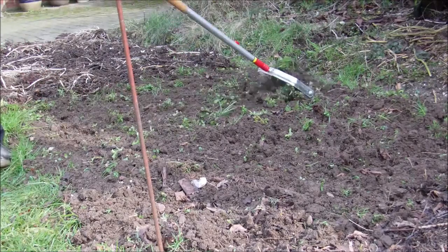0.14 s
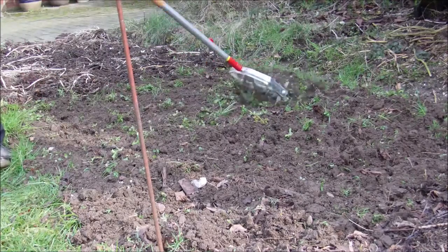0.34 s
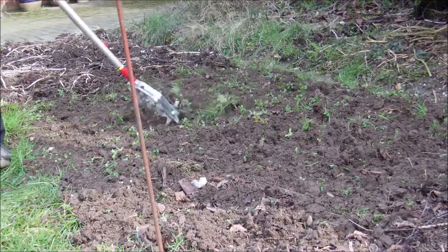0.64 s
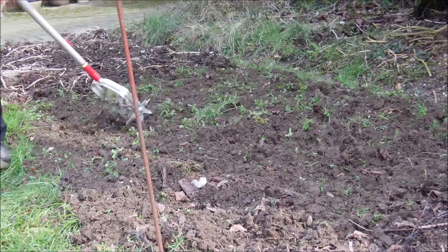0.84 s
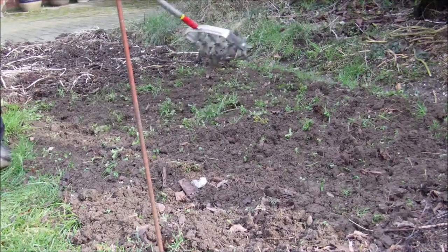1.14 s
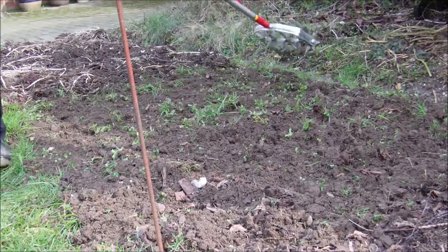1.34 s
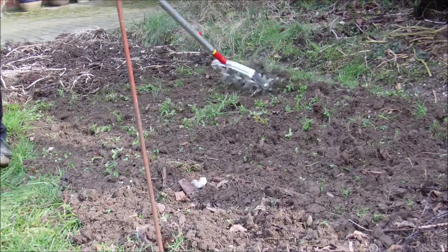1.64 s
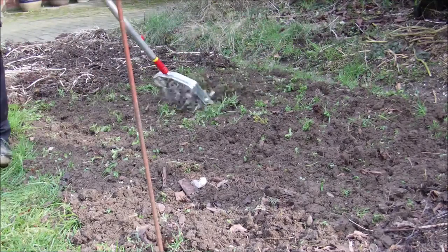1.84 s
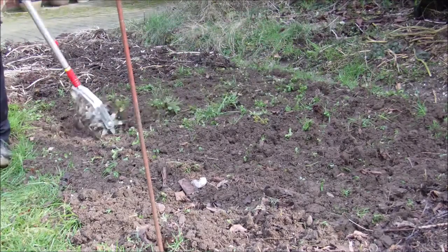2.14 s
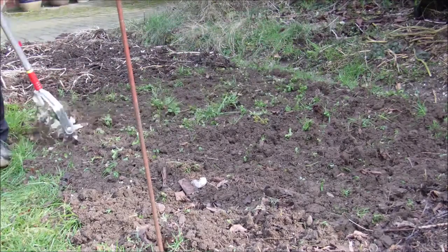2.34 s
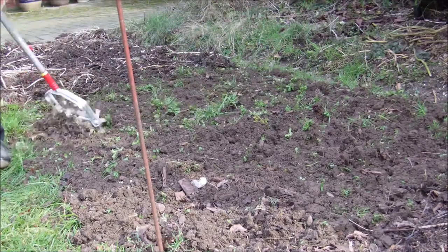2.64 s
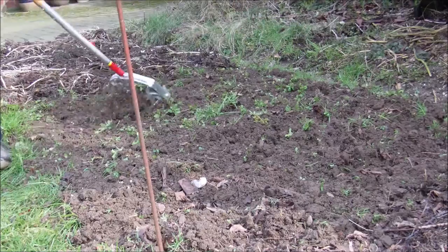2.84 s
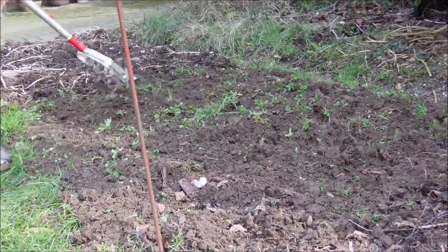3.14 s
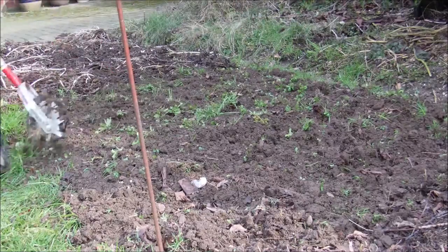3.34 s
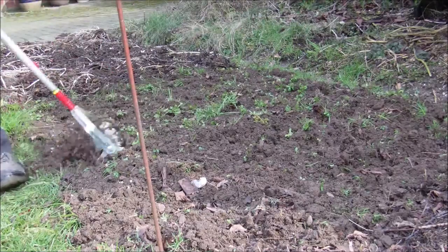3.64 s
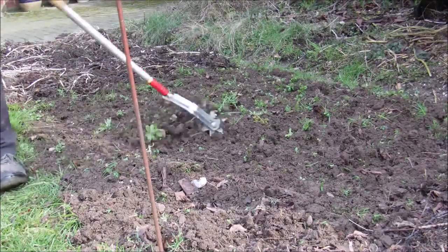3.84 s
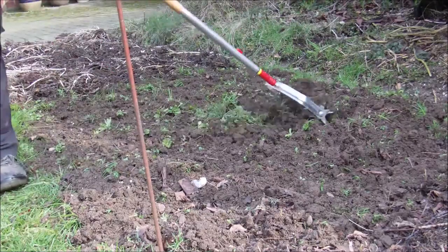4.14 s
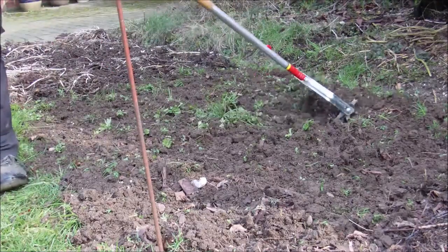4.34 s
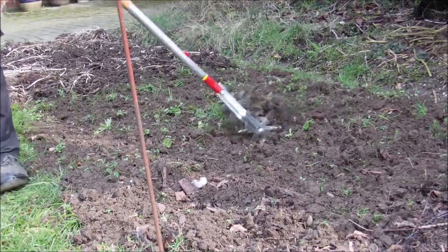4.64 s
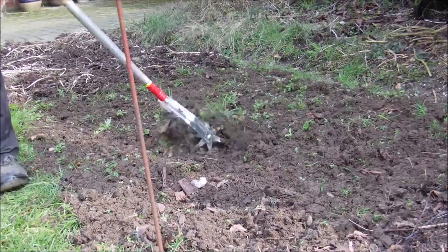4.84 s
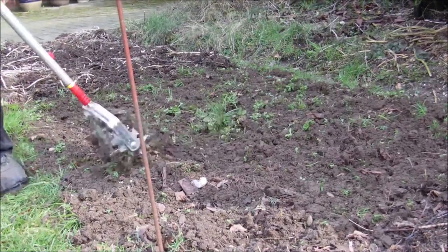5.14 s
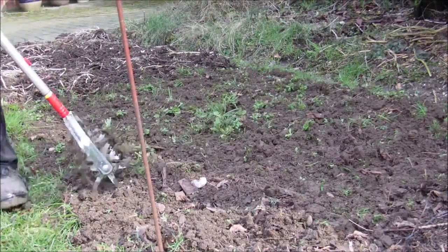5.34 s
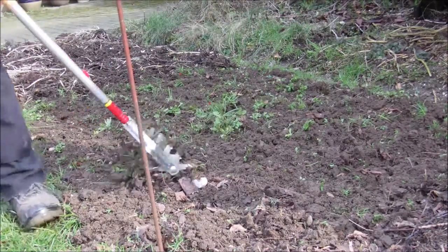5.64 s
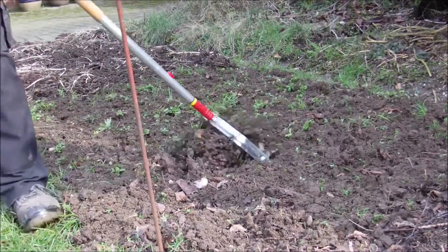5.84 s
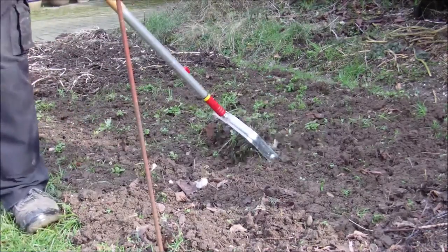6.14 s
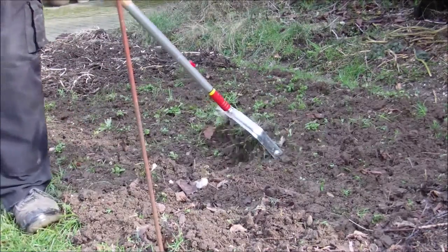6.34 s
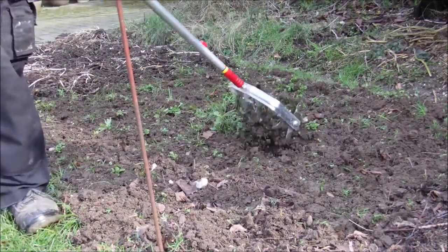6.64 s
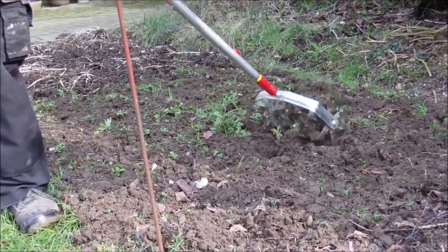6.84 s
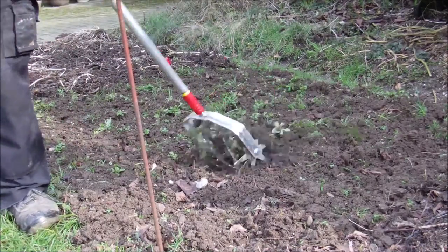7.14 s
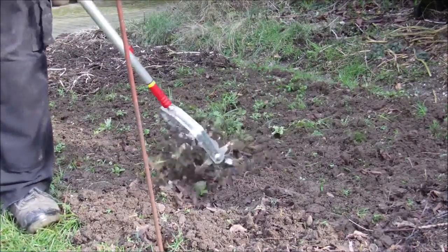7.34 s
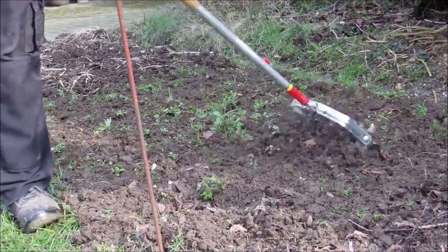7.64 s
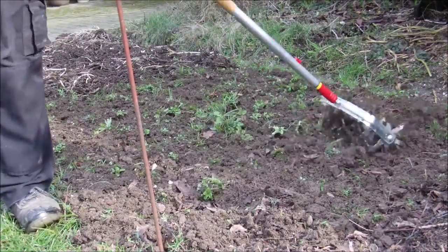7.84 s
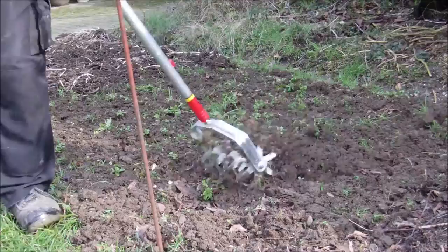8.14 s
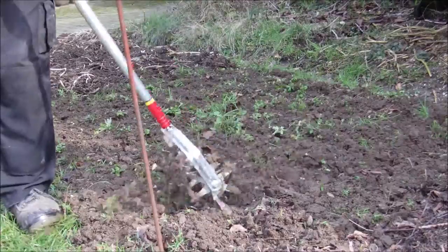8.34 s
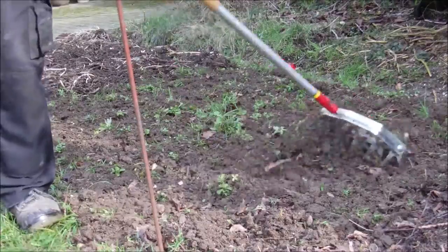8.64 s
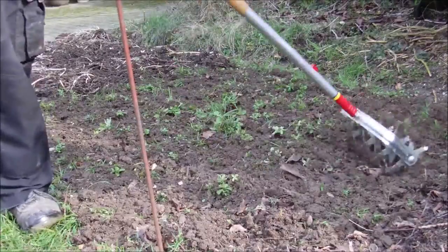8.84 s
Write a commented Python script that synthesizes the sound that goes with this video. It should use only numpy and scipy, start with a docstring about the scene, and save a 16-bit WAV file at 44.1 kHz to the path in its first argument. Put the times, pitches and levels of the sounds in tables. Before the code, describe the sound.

Close, dry outdoor sound of metal tines working earth: crunchy crumbs and hissing sand rise and fall with every stroke, steel ticks against grit, clods thud softly. A tiny squeal opens, then a piercing metallic squeal with raspy squeaks bursts out partway through. Faint whirring accompanies some movements. Later strokes come faster, with sharper clinks at the end. Soft garden air and occasional bird chirps lie behind.

```python
"""A long-handled cultivator with steel star wheels is pushed and pulled through a garden bed.
Shaped noise and tiny damped rings make the crumbling soil and sliding grit, swelling with each stroke.
Damped modes make grit clink on steel and dull knocks; a narrow noise band whirrs faintly, gliding.
The dry axle squeals in one wheel mode and squeaks in others, as tones of unsteady pitch.
A small bird calls in arched, gliding notes over faint garden air."""
import sys
import numpy as np
from scipy import signal
from scipy.fft import rfft, irfft, next_fast_len
from scipy.io import wavfile
from scipy.ndimage import uniform_filter1d, map_coordinates

SR = 44100
rng = np.random.default_rng(int(sys.argv[2]) if len(sys.argv) > 2 else 0)


def master(y):
    """Save y as 16-bit WAV."""
    cut = np.clip(np.atleast_2d(y).T, -1, 1)
    pcm = np.round(cut * 32767)  # scale
    wavfile.write(sys.argv[1], SR, pcm.astype(np.int16))


N = 396900
TOP_HZ = 16050  # band limit of the whole scene
TIME = np.arange(N) / SR


def amp(db):
    """Decibels to gain."""
    return 10 ** (np.asarray(db) / 20)


def unit(x):
    """Scale to rms 1."""
    return x / np.sqrt(np.mean(x ** 2) + 1e-20)


def add(track, s, sound):
    """Mix a sound into a track at s seconds."""
    part = track[max(round(s * SR), 0):][:len(sound)]
    part += sound[:len(part)]


def wobble(rate_hz, size=N):
    """Smooth random curve through rate_hz knots a second."""
    knots = rng.standard_normal(int(size * rate_hz / SR) + 4)
    return map_coordinates(knots, [np.arange(size) * rate_hz / SR])


def coloured(x, spectrum):
    """Shape x by (freq_hz, density_db_per_hz) points, at rms 1."""
    m = next_fast_len(len(x) + 8192)
    hz, db = np.transpose(spectrum)
    log_hz = np.log(np.fft.rfftfreq(m, 1 / SR) + 1)
    gain = amp(np.interp(log_hz, np.log(hz), db))
    return unit(irfft(rfft(x, m) * gain, m)[:len(x)])


def patchy(x, depth_db):
    """Let narrow, short-lived resonances come and go in x."""
    z = signal.stft(x, nperseg=2048)[2]
    field = uniform_filter1d(rng.standard_normal(z.shape), size=4, axis=0)  # across frequency
    field = uniform_filter1d(field, size=5, axis=1)  # across time
    gain = amp(depth_db * np.clip(unit(field), -2, 2))
    return signal.istft(z * gain, nperseg=2048)[1][:N]


def grains(count, centre_hz, spread, cycles, scatter_db, size):
    """Many tiny damped rings of random time, pitch and strength, at rms 1."""
    start, pick, strength = rng.random((count, 3)).T
    hz = np.minimum(centre_hz * np.exp(spread * (2 * pick - 1)), TOP_HZ)[:, None]
    turns = hz * np.arange(size) / SR
    heavy = np.minimum(-np.log(1 - strength), 5)
    rings = np.sin(2 * np.pi * turns) * np.exp(-turns / cycles)
    rings *= amp(scatter_db * heavy)[:, None]
    where = (start * N).astype(int)[:, None] + np.arange(size)
    return unit(np.bincount(where.ravel(), rings.ravel(), N)[:N])


def ringing(modes, t, detune, vary_db):
    """Damped modes, excited differently by every blow."""
    hz, db, t60_s = np.transpose(modes)[:, :, None]
    level, shift, phase = rng.uniform(-np.sqrt(3), np.sqrt(3), (3, len(modes), 1))
    envelope = amp(db + vary_db * level - 60 * t / t60_s)
    turns = hz * (1 + detune * shift) * t + phase
    return np.sum(envelope * np.sin(2 * np.pi * turns), axis=0)


def outdoors(x, wet_db, t60_s):
    """Ground and shrubs scatter back a faint short tail."""
    t = np.arange(SR // 3) / SR
    tail = rng.standard_normal(len(t)) * amp(-60 * t / t60_s) * (1 - np.exp(-t / 0.0093))
    return x + amp(wet_db) * signal.fftconvolve(x, tail / np.linalg.norm(tail))[:N]


# pushes and pulls, levels before trim: fastest_s, speed_up_s, slow_down_s, crumble_db, grit_db
STROKES = [(0.36, .22, 0.27, -66, -64), (0.761, 0.23, 0.18, -65, -86), (1.7, 0.38, 0.29, -74, -65.5),
           (2.08, 0.22, 0.32, -67.5, -74), (2.64, 0.16, 0.27, -74.5, -64), (3.601, 0.2, .3, -68.5, -62.5),
           (4.7, 0.34, 0.5, -72.5, -64.5), (5.719, 0.44, 0.22, -71, -62.5), (6.28, 0.25, 0.24, -72, -80.5),
           (6.8, .15, 0.17, -67, -69.5), (7.03, 0.147, 0.28, -71.5, -65.5), (7.5, 0.15, 0.21, -67.5, -60.5),
           (8.0, 0.26, 0.18, -72.5, -63.5), (8.48, 0.37, 0.27, -64, -62.5), (8.95, 0.23, .2, -68, -63.5)]
SETTLE_CRUMBLE_DB, SETTLE_GRIT_DB = -73, -79  # loose earth trickling between strokes
STROKE_SHAPE = 3.5  # 2 is a bell, more is flatter on top


def effort(column):
    """Level in dB of crumbs (0) or grit (1): each stroke swells to its fastest moment and dies away."""
    rows = np.array(STROKES)
    fastest_s, rise_s, fall_s = rows.T[:3, :, None]
    peak_db = rows.T[3:][column][:, None]
    coarse_s = TIME[::100]
    lag_s = coarse_s - fastest_s
    width_s = np.where(lag_s < 0, rise_s, fall_s)
    swells = amp(peak_db) * np.exp(-np.abs(lag_s / width_s) ** STROKE_SHAPE)
    settle = amp((SETTLE_CRUMBLE_DB, SETTLE_GRIT_DB)[column])
    level_db = 10 * np.log10(np.sum(swells ** 2, axis=0) + settle ** 2)
    return np.interp(TIME, coarse_s, level_db)


# spectrum of crumbling soil: freq_hz, density_db_per_hz
CRUMBLE = [(18, -54.5), (30, -24), (106, -12.5), (261, -15), (383, -1.5), (551, -8.5), (683, -10.5),
           (922, -5), (1270, -6), (1410, -3), (2360, -0.5), (2580, -0.5), (5000, -3.5), (6500, -29.5),
           (11000, -120)]
# spectrum of grit sliding on steel: freq_hz, density_db_per_hz
GRIT = [(1180, -29.5), (2000, -3), (2180, -10), (2910, -5), (3490, -10), (4010, -10), (4900, -5.5),
        (6200, -1.5), (7840, -5), (8630, -1.5), (10200, -1), (13900, -9), (16000, -16.5)]
# steel wheel modes, also rung by the clinks: freq_hz, level_db, t60_s
WHEEL = [(2252, -17, .05), (2940, -7, .08), (4380, -10, .11), (6320, -3.5, 0.15), (8600, 0.5, 0.097),
         (9200, -0.5, .1), (10340, 2, 0.066), (11300, -9.5, 0.076)]
CRUMBLE_TRIM_DB, GRIT_TRIM_DB, SINGING_DB = -1.8, 3.0, -15  # singing relative to grit


def soil():
    """Crumbs break and fall while sand slides over the tines; both follow strokes and surge unevenly."""
    crumble_db, grit_db = effort(0), effort(1)
    digging_db = 1.3 * wobble(24) + 0.81 * wobble(9) + 0.7 * wobble(70)
    crumbs = grains(count=9000, centre_hz=1540, spread=1.1, cycles=1.9, scatter_db=3.5, size=400)
    sand = grains(count=24000, centre_hz=7050, spread=0.75, cycles=1.5, scatter_db=4.0, size=80)
    crumble = coloured(patchy(0.5 * crumbs + rng.standard_normal(N), depth_db=6.5), CRUMBLE)
    grit = coloured(patchy(0.96 * sand + rng.standard_normal(N), depth_db=3.0), GRIT)
    # sliding sand keeps the steel faintly singing
    wheel = ringing(WHEEL, np.arange(SR // 8) / SR, detune=0.002, vary_db=1)
    singing = unit(signal.fftconvolve(sand, wheel)[:N])
    crumbling = crumble * amp(crumble_db + digging_db + CRUMBLE_TRIM_DB)
    sliding = (grit + amp(SINGING_DB) * singing) * amp(grit_db + digging_db + GRIT_TRIM_DB)
    return crumbling + sliding


# spectrum of still air: freq_hz, density_db_per_hz
GARDEN = [(15, -37.5), (25, -9), (180, -11), (373, -3.5), (1020, 0.5), (2610, -6.5), (5280, -2),
          (7710, -4.5), (9070, -2.5), (14800, -5.5), (16000, -15)]


def garden_air():
    """Steady shaped noise of the quiet garden."""
    return amp(-71) * coloured(rng.standard_normal(N), GARDEN)


# swells of the squeal, levels before the soft ceiling: peak_s, half_length_s, level_db
SQUEALS = [(0.022, .038, -13), (0.115, .02, -43.5), (3.822, .015, -33), (3.84, .009, -8), (3.883, .018, -1),
           (3.978, .018, -14), (4.008, .017, -12), (4.05, .025, -19.5), (4.08, .022, -12.5),
           (4.116, .015, -20.5), (4.18, .048, -45), (5.692, .026, -44), (7.6, .045, -54),
           (8.635, .033, -40)]
# spectrum of the hiss heard with the tone: freq_hz, density_db_per_hz
HISS = [(20, -3), (55, 4), (100, -1), (1000, 0.5), (4000, -2.5), (7000, 0.5), (12000, 1), (16000, -1.5)]
SQUEAL_HZ = 6181  # wheel mode the dry axle drives most
SQUEAL_CEILING_DB = -6  # slip cannot swing the wheel any wider


def squeal():
    """Stick and slip on the dry axle drives one wheel mode in swells; a broad grainy hiss is heard with it."""
    peak_s, half_s, db = np.transpose(SQUEALS)[:, :, None]
    swells = amp(db) * np.exp(-np.minimum(((TIME - peak_s) / half_s) ** 2, 20))
    drive = np.sqrt(np.sum(swells ** 2, axis=0))
    level = drive / (1 + (drive / amp(SQUEAL_CEILING_DB)) ** 4) ** (1 / 4)
    pitch_hz = SQUEAL_HZ * (1 + 0.0027 * wobble(250))
    phase = 2 * np.pi * np.cumsum(pitch_hz) / SR
    octave = amp(-24.5 + 4.3 * wobble(70)) * np.sin(2 * phase + 0.3 * wobble(300))
    tone = np.sqrt(2) * (np.sin(phase) + octave)
    hiss_grains = grains(count=12000, centre_hz=6030, spread=0.9, cycles=6.21, scatter_db=-0.5, size=200)
    hiss = amp(-23) * coloured(0.5 * hiss_grains + rng.standard_normal(N), HISS)
    return level * amp(0.5 * wobble(180)) * (tone + hiss)


# tines strike larger grit, levels before trim: start_s, level_db, ring_db
CLINKS = [(0.4125, -42, -14), (0.6739, -30, -9), (0.7284, -29.5, -13), (1.0824, -41.5, -18),
          (1.657, -26, -16), (1.8292, -39.5, -15), (1.9401, -37.5, -13), (2.4478, -31.5, -16),
          (2.6584, -28, -17), (2.831, -38, -15), (2.9024, -29.5, -10.5), (2.9996, -42, -15),
          (3.4192, -40, -16), (3.5946, -40, -12), (3.696, -32, -16), (4.3316, -39, -16.5),
          (5.3256, -32, -19), (5.6057, -33.5, -17), (5.6469, -28, -15.5), (6.6737, -32, -6),
          (6.9945, -41, -10), (7.1781, -41, -12), (7.3718, -25.5, -14.5), (7.4361, -24.5, -14.5),
          (7.796, -35.5, -10.5), (8.172, -24.5, -17), (8.3096, -32, -17.5), (8.4752, -31.5, -15),
          (8.5559, -19, -9), (8.5944, -22.5, -9.5), (8.9175, -15.5, -16), (8.9304, -30, -15.5)]
# spectrum of the crack: freq_hz, density_db_per_hz
CRACK = [(100, -20), (600, -16), (2000, -9.5), (4500, 2), (6500, 7), (9000, -4.5), (12000, -2.5),
         (16000, -14.5)]
CLINK_TRIM_DB, RING_TRIM_DB = -7, -4.5
SCRATCH_DB, SCRATCH_T60_S = -20.5, 0.065  # tine slides on after the crack
CLINK_T60_S, CLINK_RING_DB = 0.015, -14.5  # fade of a usual crack; its usual ring
RING_DB_PER_DOUBLING = 16  # a glancing blow rings more and drags on longer
TICKS_PER_S, TICK_OVER_GRIT_DB, TICK_SCATTER_DB, TICK_RING_DB = 18, 9.5, 3, -17


def clinks():
    """Tines hit grit: crack, short scratch and a little damped ring; random small ticks follow the strokes."""
    track, t = np.zeros(N), np.arange(SR // 5) / SR
    when, pick = rng.random((round(TICKS_PER_S * N / SR), 2)).T
    heavy = np.minimum(-np.log(1 - pick), 3)
    tick_db = effort(1)[(when * N).astype(int)] + TICK_OVER_GRIT_DB + TICK_SCATTER_DB * heavy
    ticks = [(s, db, TICK_RING_DB) for s, db in zip(when * N / SR, tick_db)]
    for s, db, ring_db in list(CLINKS) + ticks:
        t60_s = CLINK_T60_S * 2 ** ((ring_db - CLINK_RING_DB) / RING_DB_PER_DOUBLING)
        fade = amp(-60 * t / t60_s) + amp(SCRATCH_DB - 60 * t / SCRATCH_T60_S)
        crack = coloured(rng.standard_normal(len(t)), CRACK) * fade
        ring = amp(ring_db + RING_TRIM_DB) * ringing(WHEEL, t, detune=0.0018, vary_db=7)
        onset = 1 - np.exp(-45 * t / t60_s)  # a longer crack sets in more softly
        add(track, s, amp(db + CLINK_TRIM_DB) * (crack + ring) * onset)
    return track


# dull knocks of stones and clods, a few higher ones from the wheel, before trim: start_s, level_db, pitch_hz
KNOCKS = [(0.655, -45, 1173), (0.684, -48.5, 1300), (1.941, -45.5, 1340), (2.658, -47, 2200),
          (2.903, -53, 1740), (3.596, -51.5, 1740), (5.365, -45.5, 1430), (6.676, -35, 1260),
          (7.44, -41.5, 2410), (8.172, -50.5, 1440), (8.308, -52, 1088), (8.679, -47, 1800),
          (8.689, -45, 1730), (8.917, -42, 1900), (8.994, -43.5, 2190)]
# modes of a knock: pitch_ratio, level_db, t60_s
KNOCK_MODES = [(0.829, -6, 0.055), (1.018, 6.5, 0.033), (1.25, -3, .027), (1.6, -2.5, .03)]
KNOCK_TRIM_DB = -6.0
CLODS_PER_S, CLOD_OVER_CRUMBLE_DB, CLOD_LOW_HZ, CLOD_OCTAVES = 17, 7, 852, 1.8


def knocks():
    """Dull knocks of stones and clods, a few higher ones from the wheel; small clods tumble at random."""
    track, t = np.zeros(N), np.arange(SR // 8) / SR
    thud_spectrum = [(60, -17), (500, -20), (1500, -4), (2600, 0), (5000, -19.5)]
    when, pick = rng.random((round(CLODS_PER_S * N / SR), 2)).T
    clod_db = effort(0)[(when * N).astype(int)] + CLOD_OVER_CRUMBLE_DB
    clods = zip(when * N / SR, clod_db, CLOD_LOW_HZ * 2 ** (CLOD_OCTAVES * pick))
    for s, db, hz in list(KNOCKS) + list(clods):
        thud = coloured(rng.standard_normal(len(t)), thud_spectrum) * amp(-60 * t / 0.051)
        ring = ringing(np.array(KNOCK_MODES) * [hz, 1, 1], t, detune=0.055, vary_db=1.5)
        onset = 1 - np.exp(-t / 0.001)
        add(track, s, amp(db + KNOCK_TRIM_DB) * (ring + 0.81 * thud) * onset)
    return track


NOTE_TRIM_DB = 5


def note(length_s, start_hz, middle_hz, end_hz, db):
    """One whistled note: a parabolic pitch glide with a slight warble and a weak octave."""
    u = np.linspace(0, 1, round(length_s * SR))
    glide = np.polyfit([0, 0.5, 1], [start_hz, middle_hz, end_hz], 2)
    hz = np.polyval(glide, u) * (1 + 0.017 * wobble(300, size=len(u)))
    phase = 2 * np.pi * np.cumsum(hz) / SR
    whistle = np.sin(phase) + amp(-25) * np.sin(2 * phase)
    return amp(db + NOTE_TRIM_DB) * np.sin(np.pi * u) * whistle


# calls, levels before note trim: start_s, level_db
BIRD_CALLS = [(0.574, -52), (1.303, -53.5), (3.372, -53), (7.475, -54)]
# notes of a call, levels relative to it: delay_s, length_s, start_hz, middle_hz, end_hz, level_db
BIRD_PHRASE = [(0, 0.077, 4000, 4880, 4480, -4), (0.029, 0.052, 3304, 5210, 3010, -1.5),
               (0.009, 0.022, 5100, 6000, 6900, -10.5), (0.027, 0.013, 4370, 5480, 4100, -15),
               (0.072, 0.0247, 3590, 4090, 3640, -6.5), (0.109, 0.046, 3260, 4140, 5223, -10),
               (0.136, 0.02, 5400, 4300, 3000, -5.5)]
# single falling chips, levels before note trim: start_s, start_hz, level_db
BIRD_CHIPS = [(0.243, 4350, -57), (0.279, 3580, -56), (0.98, 3950, -62)]
CHIP_S, CHIP_MIDDLE, CHIP_END = 0.036, 0.87, 0.75  # length; pitches as shares of the start


def bird():
    """A small bird repeats a twittering phrase, with a few chips between."""
    track = np.zeros(N)
    for s, call_db in BIRD_CALLS:
        for delay_s, *shape in BIRD_PHRASE:
            add(track, s + delay_s, amp(call_db) * note(*shape))
    for s, hz, db in BIRD_CHIPS:
        add(track, s, note(CHIP_S, hz, CHIP_MIDDLE * hz, CHIP_END * hz, db))
    return track


# faint whirrs as the tool moves, levels before trim: start_s, end_s, start_hz, end_hz, level_db
WHIRRS = [(0.33, 0.566, 2010, 1790, -72), (0.552, 1.025, 1572, 1508, -70),
          (1.349, 2.146, 1573, 1880, -75.5), (6.054, 6.52, 1776, 1780, -73.5),
          (6.648, 6.903, 1950, 2140, -69), (7.479, 7.796, 2304, 1873, -67.5),
          (8.284, 8.56, 2196, 1850, -65)]
WHIRR_FADE_S, WHIRR_TRIM_DB = 0.028, -2


def whirr():
    """Faint whirr: a narrow noise band, uneven in level, gliding in pitch as the tool moves."""
    track = np.zeros(N)
    for start_s, end_s, start_hz, end_hz, db in WHIRRS:
        t = np.arange(round((end_s - start_s) * SR)) / SR
        size = len(t)
        phase = 2 * np.pi * np.cumsum(np.linspace(start_hz, end_hz, size)) / SR
        # random amplitudes turn the gliding carrier into a noise band
        band = unit(wobble(171, size) * np.sin(phase) + wobble(190, size) * np.cos(phase))
        fade = np.minimum(np.minimum(t, t[::-1]) / WHIRR_FADE_S, 1)
        level = amp(db + 3.2 * wobble(18.6, size) + WHIRR_TRIM_DB)
        add(track, start_s, level * fade * band)
    return track


# squeaks in other wheel modes: peak_s, half_length_s, pitch_hz, level_db, roughness_share
SQUEAKS = [(2.721, .009, 4050, -53, 0.0055), (2.775, 0.021, 2210, -60.5, 0.0028),
           (3.749, .007, 2310, -53, .004), (3.78, .025, 10340, -40.5, .001),
           (3.821, .024, 10325, -27.5, .002), (3.845, .007, 8520, -28, 0.0055),
           (3.848, .006, 2290, -37, 0.01), (3.85, .008, 4606, -35, .006),
           (3.918, .015, 2444, -34.5, 0.0023), (3.921, .022, 8900, -41.5, .002),
           (3.956, .015, 10400, -36, .003), (3.982, .026, 4780, -37, 0.0094),
           (3.985, .026, 7550, -32.5, .003), (3.975, .02, 11000, -38.5, .005),
           (4.006, .011, 2910, -45, 0.0071), (4.139, .012, 2264, -50, 0.0048),
           (4.143, .01, 4490, -52.5, .004), (4.145, .011, 3940, -50.5, 0.0036),
           (5.649, .016, 4175, -54, 0.0064), (5.743, .027, 2326, -57.5, .015),
           (5.783, .008, 2420, -49.5, .005), (7.573, .012, 4033, -57, 0.0047),
           (8.571, .019, 2192, -38, .011), (8.576, .009, 4460, -36, 0.0035)]
# overtones of a squeak, levels before richness: multiple, level_db
OVERTONES = [(2, -0.5), (3, 1.5), (4, -3), (5, -8.5)]
# spectrum of the scratch inside a squeak: freq_hz, density_db_per_hz
RASP = [(30, -14.5), (500, -11), (2000, -5), (6000, 2), (10500, -1.5), (13000, -9), (16000, -13)]
# loud squeaks near RICH_HZ are rich in overtones; faint or distant-pitched ones are nearly pure
RICH_HZ, RICH_AT_DB, RICHEST_DB = 2600, -41.5, 4
RICHER_DB_PER_DB, PURER_DB_PER_OCTAVE = 1.6, 20.5


def squeaks():
    """As the load shifts, friction jumps to other modes; uneven slipping roughens them to a rasp."""
    track = np.zeros(N)
    t = np.arange(-SR // 8, SR // 8) / SR
    size = len(t)
    for s, half_s, hz, db, rough in SQUEAKS:
        octaves_off = abs(np.log2(hz / RICH_HZ))
        richness_db = RICHER_DB_PER_DB * (db - RICH_AT_DB) - PURER_DB_PER_OCTAVE * octaves_off
        richness_db = min(richness_db, RICHEST_DB)
        phase = 2 * np.pi * np.cumsum(hz * (1 + rough * wobble(990, size))) / SR
        upper = sum(amp(level_db) * np.sin(multiple * phase)
                    for multiple, level_db in OVERTONES if multiple * hz < TOP_HZ)
        tone = np.sqrt(2) * (np.sin(phase) + amp(richness_db) * upper)
        chatter = amp(2.6 * wobble(170, size)) * (1 + 22 * rough * wobble(2200, size))
        rasp = (0.1 + 26 * rough) * np.std(tone) * coloured(rng.standard_normal(size), RASP)
        swell = np.exp(-np.abs(t / half_s) ** 4.7)
        add(track, s + t[0], amp(db) * swell * (tone * chatter + rasp))
    return track


def scene():
    """The tool at work, the bird and the quiet garden."""
    impacts_and_squeaks = outdoors(clinks() + knocks() + squeaks(), wet_db=-15.5, t60_s=0.26)
    tool = soil() + whirr() + squeal() + impacts_and_squeaks
    return (tool + outdoors(bird(), wet_db=-14.0, t60_s=0.29) + garden_air())[None]


def record(dry):
    """Keep only what lies below the band limit."""
    m = next_fast_len(N + SR // 2)
    passed = np.fft.rfftfreq(m, 1 / SR) < TOP_HZ
    return irfft(rfft(dry, m) * passed, m)[:, :N]


dry = scene()
out = record(dry)
master(out)
```